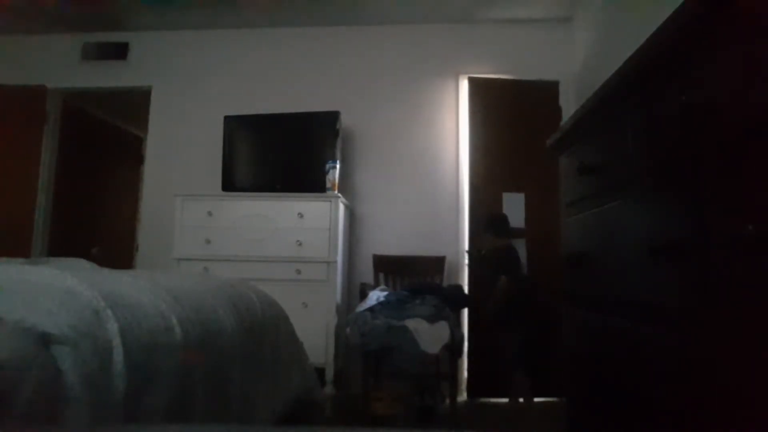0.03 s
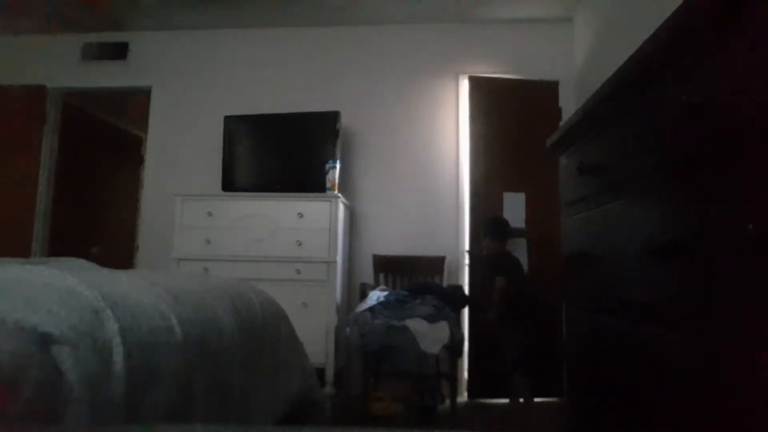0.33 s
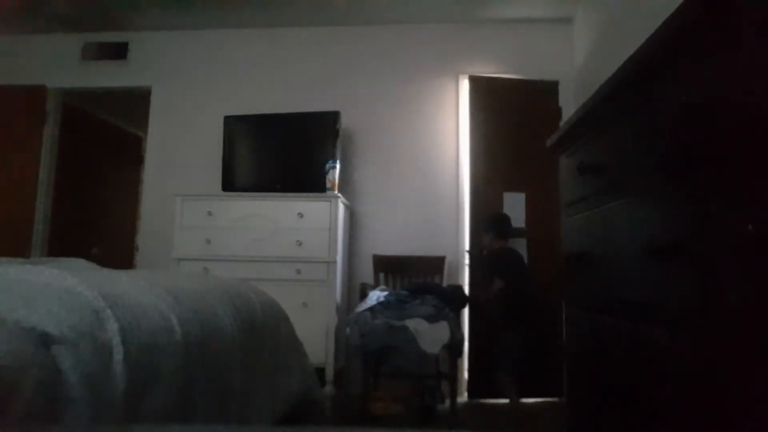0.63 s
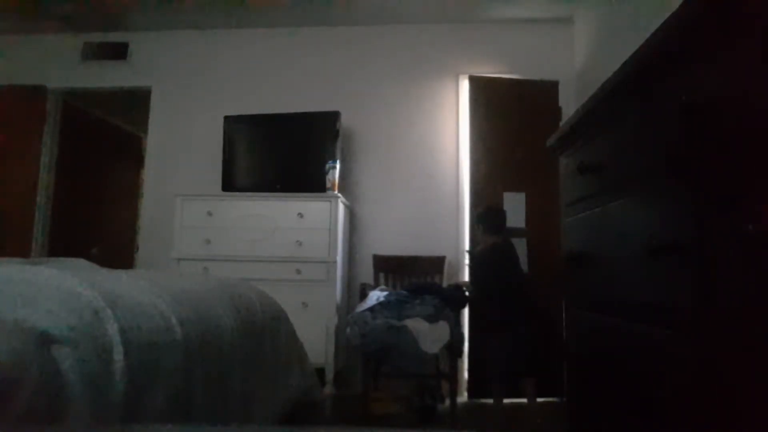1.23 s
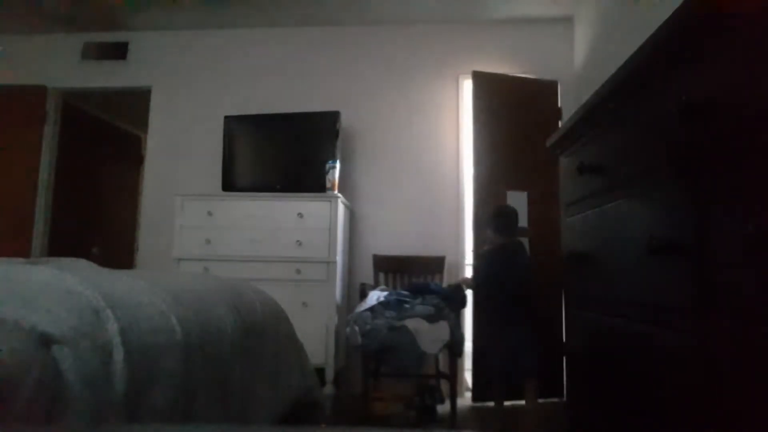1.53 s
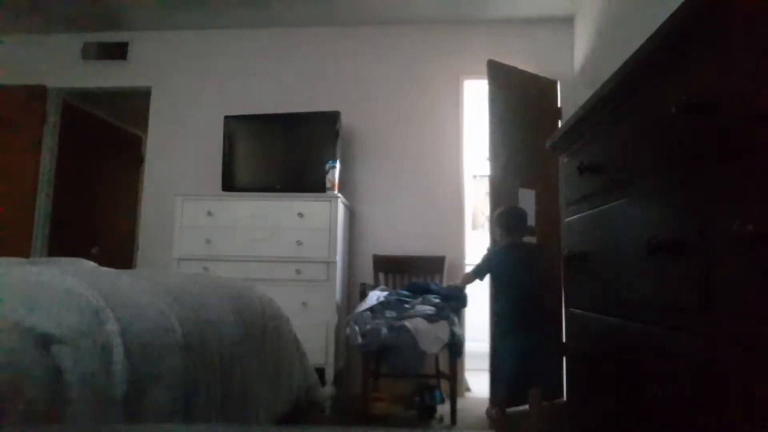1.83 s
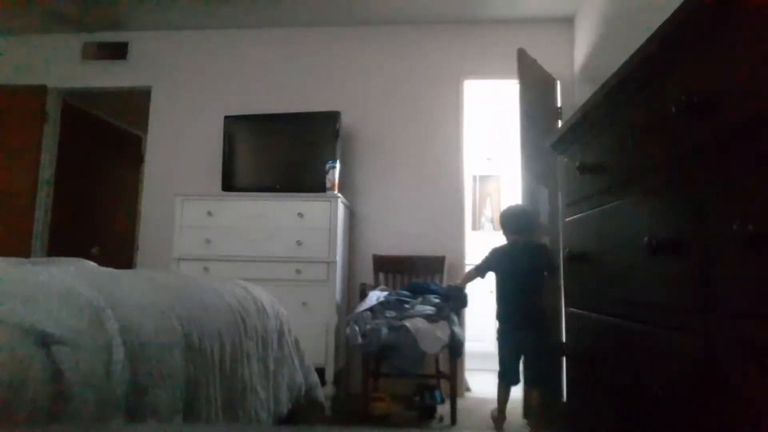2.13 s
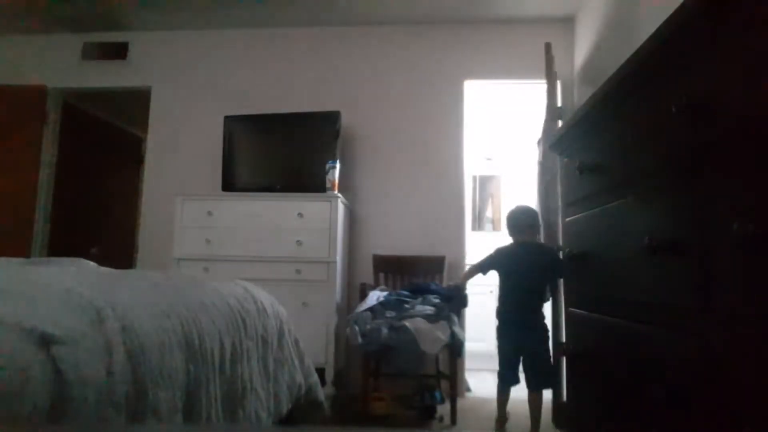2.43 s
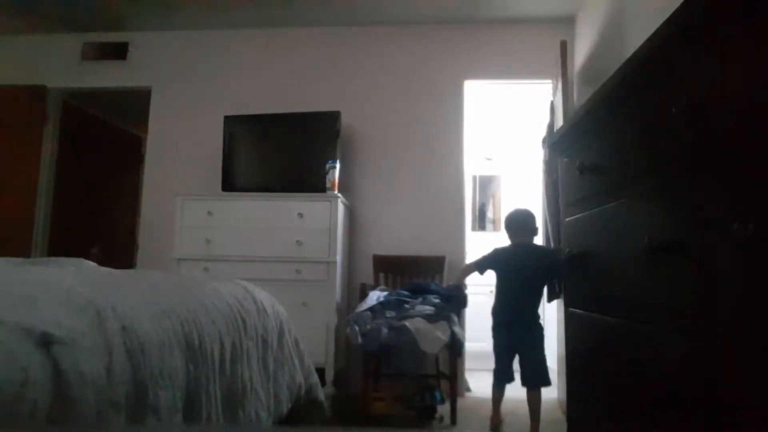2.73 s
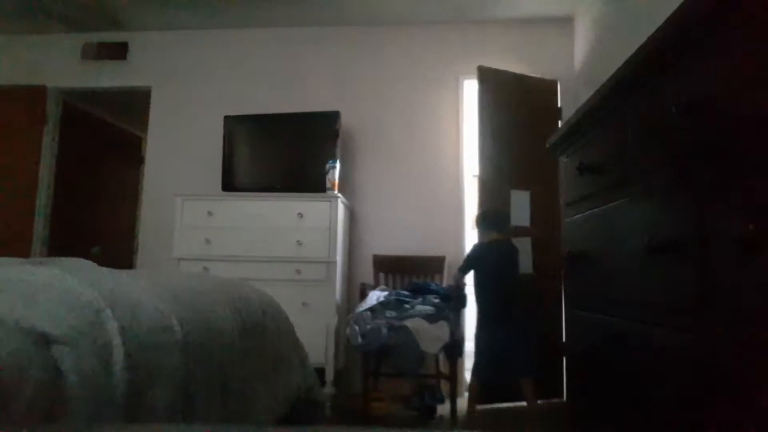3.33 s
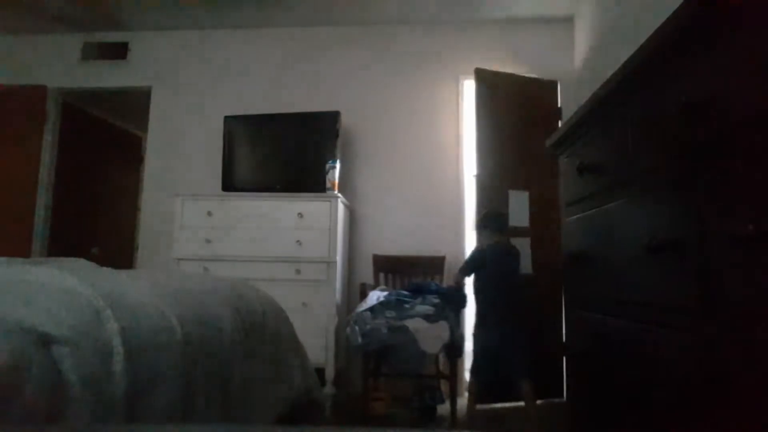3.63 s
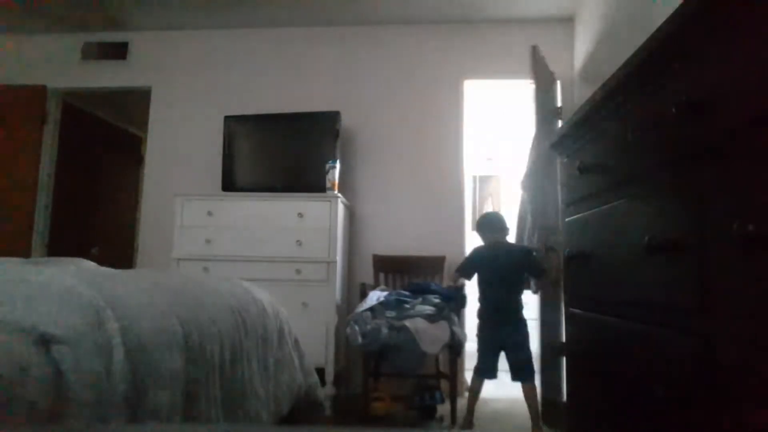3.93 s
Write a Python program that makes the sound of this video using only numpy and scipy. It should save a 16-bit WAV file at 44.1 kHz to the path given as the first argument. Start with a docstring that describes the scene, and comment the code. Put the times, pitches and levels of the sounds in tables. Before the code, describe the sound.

Squeaky door hinges whistle and judder as the door swings, knocking and clicking in a quiet room.

```python
"""Creaking bedroom door

A quiet bedroom, the microphone across the room from a door that is swung open, pushed nearly shut and
pulled again. Its dry hinges stick and slip: they whistle, squeak and judder so that the door panel hums.
The door rubs faintly before it gives, and later knocks and clicks. Right at the microphone a camera's
focus motor buzzes briefly, then ticks; under it all lies the dull background of the house."""
import sys
import numpy as np
from scipy import signal
from scipy.fft import rfft, irfft
from scipy.io import wavfile

SR = 44100
rng = np.random.default_rng(int(sys.argv[2]) if len(sys.argv) > 2 else 0)


def wrap_up_sound(samples):
    """Save the sound to the file named by the first command line argument, as 16-bit audio."""
    columns = np.atleast_2d(samples).T
    # keep every value between -1 and 1, then stretch to whole-number steps
    tamed = np.clip(columns, -1, 1)
    steps = np.round(tamed * 32767).astype(np.int16)
    wavfile.write(sys.argv[1], SR, steps)


N = 176400
T = np.arange(N) / SR


def from_db(db):
    """Decibels to gain."""
    return 10 ** (np.asarray(db) / 20)


def unit_rms(x):
    """Scale to an rms of 1."""
    return x / np.sqrt(np.mean(x ** 2) + 1e-20)


def in_time(rows):
    """Each column of a timed curve at every sample."""
    times, *columns = np.transpose(rows)
    return [np.interp(T, times, column) for column in columns]


def at_hz(points, hz):
    """Read a table on a log-frequency axis."""
    freqs, values = np.transpose(points)
    return np.interp(np.log(hz), np.log(freqs), values)


def gate(start, end, attack_s=0.0074, release_s=0.0063):
    """Attack, hold and release between two times."""
    return np.clip((T - start) / attack_s, 0, 1) * np.clip((end - T) / release_s, 0, 1)


def drift(hz, size):
    """Random wander, mostly slower than hz, with an rms of 1."""
    pole = np.exp(-2 * np.pi * hz / SR)
    white = rng.standard_normal(size + SR // 10)
    return unit_rms(signal.lfilter([1], [1, -2 * pole, pole * pole], white)[-size:])


def clicks(turns):
    """One unit click at each whole turn."""
    return np.diff(np.floor(turns), prepend=np.floor(turns[0]))


def ring(drive, modes):
    """Damped modes (frequency [Hz], level [dB], t60 [s]) rung in parallel by one drive."""
    out = 0
    for hz, db, t60 in modes:
        radius, angle = from_db(-60 / (t60 * SR)), 2 * np.pi * hz / SR
        feedback = [1, -2 * radius * np.cos(angle), radius ** 2]
        out = out + from_db(db) * signal.lfilter([.5, 0, -.5], feedback, drive + 1e-18)
    return out


def panned(x, pan_db):
    """Place a sound in the stereo image; pan_db is left minus right."""
    return x * from_db([[pan_db / 2], [-pan_db / 2]])


# diffuse sound at the microphone: (frequency [Hz], left-right correlation [0-1])
STEREO_LIKENESS = [(100, 0.89), (300, 0.73), (700, 0.66), (1500, 0)]


def noise_bands(size):
    """Half-octave bands of stereo noise, both sides alike in the bass; yields (centre Hz, band)."""
    edges = 22 * 2 ** (np.arange(20) / 2)
    white = rng.standard_normal((2, 2, size))
    for k, (low, high) in enumerate(zip(edges, edges[1:])):
        bandpass = signal.butter(2, [low, high], "band", fs=SR, output="sos")
        mid, side = signal.sosfilt(bandpass, white[k % 2])
        hz = np.sqrt(low * high)
        alike = at_hz(STEREO_LIKENESS, hz)
        yield hz, np.sqrt(1 + alike) * mid + np.sqrt(1 - alike) * side * [[1], [-1]]


# colour of the room tone: (frequency [Hz], relative density [dB])
ROOM_TONE_SPECTRUM = [(25, -30), (59, -7.5), (89, -13.5), (200, -7), (500, -6), (1240, -24.5),
                      (1920, -18.5), (2370, -25.5), (15000, -38.5)]
# its loudness at the microphone: (time [s], level [dB])
ROOM_TONE_LEVEL = [(0, -42.5), (.08, -56), (.3, -59), (1.1, -59), (2.7, -56.5), (3.3, -53.5), (4, -55.5)]


def room_tone(flicker_db=1.8, flicker_hz=35):
    """Soft, dull background of the house, all around the microphone; each band flickers a little."""
    level_db, = in_time(ROOM_TONE_LEVEL)
    noise = sum(band * from_db(at_hz(ROOM_TONE_SPECTRUM, hz) + flicker_db * drift(flicker_hz, N))
                for hz, band in noise_bands(N))
    return from_db(level_db) * unit_rms(noise)


# resonances of the camera's lens: (frequency [Hz], relative level [dB], t60 [s])
LENS_MODES = [(4030, -13, 0.0099), (4470, -2, 0.0015), (11560, -2.5, 0.0034), (14000, -13, .002)]


def focus_motor(steps_per_s=551, buzz_db=-48, buzz_end_s=0.195, ticks_per_s=29.45, tick_db=-54.5):
    """Right at the microphone, a motor rings the lens: a thin buzz of uneven steps, then faint ticks."""
    step_rate = steps_per_s * (1 + 0.0098 * drift(140, N))
    steps = clicks(np.cumsum(step_rate) / SR)
    buzz = steps * from_db(buzz_db + rng.standard_normal(N))   # steps vary by about 1 dB
    ticks = from_db(tick_db) * clicks((T - 0.0215) * ticks_per_s)
    lens = ring(np.where(T < buzz_end_s, buzz, ticks), LENS_MODES)
    return signal.sosfilt(signal.butter(8, 3700, "high", fs=SR, output="sos"), lens)


# the door rubs before it gives: (time [s], length [s], level [dB])
DOOR_RUBS = [(.49, .08, -76), (.68, .12, -73)]


def door_rubs(hz=1900, t60_s=0.008):
    """Dry friction, a narrow hiss that barely carries across the room."""
    hiss = unit_rms(ring(rng.standard_normal(N), [(hz, 0, t60_s)]))
    return hiss * sum(from_db(db) * gate(start, start + length) for start, length, db in DOOR_RUBS)


SLIPS_PER_S, STUTTER_HZ = 31.7, 90   # a hinge's regular slipping; bandwidth of its random catching


def friction_tone(hz, overtones_db, rough, waver_share=0.04, shimmer_db=3, waver_hz=323):
    """Stick-slip tone with overtones; the rougher it is, the more pitch and strength waver."""
    hz = hz * (1 + rough * waver_share * drift(waver_hz, len(hz)))
    phase = 2 * np.pi * np.cumsum(hz) / SR
    tone = np.sin(phase)
    for k in range(2, int(SR / 2 / hz.mean()) + 1):
        tone += from_db(overtones_db * (k - 1) ** (3 / 4)) * np.sin(k * phase)
    shimmer = from_db(rough * shimmer_db * drift(waver_hz, len(hz)))
    return unit_rms(tone * shimmer)


# two long whistles of a hinge: (time [s], pitch [Hz], level [dB])
HIGH_GLIDE = [(1.25, 11460, -38), (1.274, 11350, -37.5), (1.312, 11100, -31.5), (1.348, 10670, -29),
              (1.41, 9970, -42.5), (1.45, 9860, -60)]
LOW_GLIDE = [(1.96, 2430, -80), (1.992, 2530, -63), (2.012, 2476, -44.5), (2.045, 2428, -36.5),
             (2.1, 2379, -35), (2.235, 2376, -37.5), (2.28, 2350, -49.5), (2.32, 2280, -65)]


def hinge_whistle(glide, overtones_db, rough, flutter_share, flutter_db, crest_s):
    """A gliding friction tone whose pitch and strength flutter at the slip rate, cresting at crest_s."""
    hz, db = in_time(glide)
    flutter = np.cos(2 * np.pi * SLIPS_PER_S * (T - crest_s))
    tone = friction_tone(hz * (1 + flutter_share * flutter), overtones_db, rough)
    return tone * from_db(db + flutter_db * (flutter - .5)) * gate(glide[0][0], glide[-1][0])


# short squeaks of the hinges: (time [s], length [s], first pitch [Hz], last pitch [Hz], level [dB],
# overtones [dB], roughness [0 clear, about 1 rough], pan [dB])
HINGE_SQUEAKS = [ (1.345, 0.069, 5390, 5020, -40, -47, 0.02, -1.5),
                 (1.402, 0.049, 1860, 2090, -49, -34, 1.1, 2),
                 (1.407, 0.091, 3234, 3420, -46, -21, 0.27, 6),
                 (1.416, 0.03, 8400, 8370, -38.5, -40, 0, -0.5),
                 (1.468, 0.017, 1705, 1640, -29.5, -7, 0.4, -3),
                 (1.469, 0.043, 4007, 4160, -35, -23, 0.2, 0),
                 (1.51, 0.0566, 4115, 4153, -35, -19, 0.25, -1.5),
                 (1.532, 0.09, 1730, 1544, -49.5, -7, 1.23, 3),
                 (1.751, 0.037, 1995, 1909, -49.5, -41, 0.7, -1),
                 (2.546, .036, 2088, 2040, -31.5, -11.5, 0.94, 1),
                 (2.551, 0.039, 2401, 2452, -36.5, -7.5, 0.9, -8),
                 (2.857, 0.045, 2065, 1535, -37, -27, 0.26, 1),
                 (2.886, 0.034, 3150, 3232, -47, -13.5, 0.22, -5),
                 (3.231, 0.073, 12800, 13100, -47.5, -44, 0.25, -12),
                 (3.257, 0.058, 11150, 11390, -31.5, -25, 0.11, -4),
                 (3.279, 0.018, 11300, 11280, -28.5, -40, .03, -12),
                 (3.280, 0.072, 9320, 9450, -45.5, -22, 0.37, -2),
                 (3.287, 0.037, 2056, 1926, -48, -34, 0.52, 1.5),
                 (3.407, 0.032, 5590, 5540, -38.5, -11, 0.45, -6),
                 (3.488, 0.027, 4700, 4920, -38.5, -13, 0.42, 1),
                 (3.479, 0.036, 1936, 1877, -40.5, -8, 1.1, 4),
                 (3.514, 0.03, 1937, 2036, -29.5, -18.5, 0.35, -1.5),
                 (3.729, 0.016, 2820, 2790, -42.5, -26, 0.86, 1.5),
                 (3.769, 0.046, 2794, 2664, -34, -14.5, 0.49, -2.5),
                 (3.798, 0.027, 2140, 1850, -30.5, -15, 1.04, 1),
                 (3.86, 0.018, 2044, 1898, -23, -22.5, 0.02, 1.5)]


def hinge_squeaks(stutter_db=5):
    """Each squeak slides from its first pitch to its last; rough ones catch and break up."""
    out = np.zeros((2, N))
    for start, length, first_hz, last_hz, db, overtones_db, rough, pan_db in HINGE_SQUEAKS:
        span = slice(int(start * SR), int(start * SR) + SR // 8)
        hz = np.interp(T[span], [start, start + length], [first_hz, last_hz])
        catching = np.tanh(2 * drift(STUTTER_HZ, len(hz)))
        stutter = unit_rms(from_db(stutter_db * np.sqrt(rough) * catching))
        envelope = from_db(db) * gate(start, start + length)[span]
        out[:, span] += panned(friction_tone(hz, overtones_db, rough) * stutter * envelope, pan_db)
    return out


# resonances of the door panel: (frequency [Hz], relative level [dB], t60 [s])
PANEL_MODES = [(64.4, -11, 0.3), (127.9, 1, 0.45), (219.3, -7, 0.11), (239, -8.5, 0.12),
               (321, -12.5, 0.059), (540, -8.5, 0.051), (405, -14, 0.069), (696, -9, 0.011),
               (1167, -17, 0.071)]


def panel_hum(slips, slip_speed, grind_db=14, swing_db=2.5, kick_spread_db=0.5, shudder_db=2.5):
    """Uneven slips kick the panel's two lowest modes, grinding drives the rest, and the whole shudders."""
    grinding = unit_rms(rng.standard_normal(N) * from_db(swing_db * slip_speed))
    kicks = unit_rms(clicks(slips) * from_db(kick_spread_db * rng.standard_normal(N)))
    hum = ring(kicks, PANEL_MODES[:2]) + from_db(grind_db) * ring(grinding, PANEL_MODES[2:])
    shudder = from_db(shudder_db * np.tanh(drift(STUTTER_HZ, N)))
    return unit_rms(hum * shudder)


# course of the judder: (time [s], squeal level [dB], roughness [0-1], panel level [dB])
HINGE_JUDDER = [(1.491, -35, 0.21, -84), (1.571, -36.5, .15, -49), (1.61, -35, 1, -42.5),
                (1.665, -37, 0.87, -38.5), (1.721, -36.5, 0.89, -42), (1.765, -39, .8, -43.5),
                (1.795, -69, .8, -40.5), (1.83, -74, .8, -50.5)]


def hinge_judder(clear_hz=4985, sag_hz=199, bend_share=0.036, overtones_db=-22.5, first_slip_s=1.503):
    """A clear squeal sinks as it turns raspy; each slip bends it, chirps and kicks the door panel."""
    squeal_db, rough, panel_db = in_time(HINGE_JUDDER)
    moving = gate(HINGE_JUDDER[0][0], HINGE_JUDDER[-1][0])
    level = from_db(squeal_db) * moving
    slips = (T - first_slip_s) * SLIPS_PER_S
    slip_speed = np.cos(2 * np.pi * slips)
    hz = clear_hz - sag_hz * rough
    squeal = friction_tone(hz * (1 + bend_share * rough * slip_speed), overtones_db, rough)
    squeal = unit_rms(squeal * from_db(slip_speed))   # swings 1 dB either way with each slip
    sizzle = from_db(-19.5) * friction_tone(3 * hz, overtones_db, rough.max())   # rough third harmonic
    octave = friction_tone(np.full(N, 2 * hz.mean()), overtones_db, rough=0.178)
    from_slip_s = (slips - np.round(slips)) / SLIPS_PER_S
    chirps = from_db(4) * octave * np.exp(-(from_slip_s / 0.0032) ** 2)   # a few ms around each slip
    panel = panel_hum(slips, slip_speed) * from_db(panel_db) * moving
    return (squeal + sizzle) * level, chirps * level, panel


# knocks and clicks of the door: (time [s], thud [dB], wood [dB], rattle [dB], latch [dB])
DOOR_KNOCKS = [(2.392, -73, -63, -38.5, -74.5), (2.597, -58, -51, -39, -54), (2.614, -39, -42, -32, -45.5),
               (3.010, -48, -42.5, -39.5, -79), (3.019, -46.5, -32, -47.5, -89),
               (3.157, -52.5, -54.5, -43, -84), (3.513, -46, -40, -41.5, -42),
               (3.639, -66, -57, -41.5, -73.5), (3.680, -64, -43.5, -40.5, -52),
               (3.697, -34, -45.5, -49.5, -39), (3.723, -57, -46.5, -38, -56),
               (3.989, -68, -44.5, -41, -64)]


def door_knocks(attack_s=0.0022, t60_s=0.061, thud_coupling_db=-17):
    """Each knock is a short rattling burst with its own colour; its thud rings the door panel."""
    wood_hz, rattle_hz, latch_hz = 635, 2060, 11000
    bursts, thuds = np.zeros((2, N + SR))
    t = T[:SR // 4]
    envelope = np.minimum(t / attack_s, 1) * from_db(-60 * t / t60_s)
    hz = np.maximum(np.fft.rfftfreq(len(t), 1 / SR), 1)
    pink = np.sqrt(SR / hz)
    for start, thud_db, *levels_db in DOOR_KNOCKS:
        span = slice(int(start * SR), int(start * SR) + len(t))
        noise = rng.standard_normal(len(t))
        colour = pink * from_db(np.interp(np.log(hz), np.log([wood_hz, rattle_hz, latch_hz]), levels_db))
        bursts[span] += envelope * irfft(rfft(noise) * colour, len(t))
        thuds[span] += envelope * noise * from_db(thud_db + thud_coupling_db)
    rattle = signal.sosfilt(signal.butter(4, 152, "high", fs=SR, output="sos"), bursts[:N])
    return rattle + ring(thuds[:N], PANEL_MODES[2:])


# decay of the bedroom: (frequency [Hz], t60 [s])
BEDROOM_DECAY = [(120, 0.33), (2000, 0.23), (5000, 0.23), (12000, 0.13)]
# echoes off the nearest walls: (left delay [s], right delay [s], level against the tail [dB])
WALL_ECHOES = [(.0075, 0.008, -9), (0.0175, 0.015, -10.5)]


def bedroom(x, wet_db, tail_delay_s=0.0017, right_lag_s=0.00007):
    """From door to microphone: direct sound, wall echoes and a tail that dies faster in the treble."""
    t = T[:SR // 2]
    tail = sum(band * from_db(-60 * t / at_hz(BEDROOM_DECAY, hz)) for hz, band in noise_bands(len(t)))
    response = unit_rms(tail * (t > tail_delay_s)) / np.sqrt(len(t))
    for left_s, right_s, db in WALL_ECHOES:
        response[[0, 1], [int(left_s * SR), int(right_s * SR)]] += from_db(db)
    response *= from_db(wet_db)
    response[[0, 1], [0, int(right_lag_s * SR)]] += 1   # direct sound
    return signal.fftconvolve(np.atleast_2d(x), response, axes=1)[:, :N] / np.hypot(1, from_db(wet_db))


def scene():
    """The door sounds from across the bedroom; the focus motor is close and dry."""
    squeal, chirps, panel = hinge_judder()
    high_whistle = hinge_whistle(HIGH_GLIDE, overtones_db=-43, rough=0.058,
                                 flutter_share=0.0043, flutter_db=5.5, crest_s=1.277)
    low_whistle = hinge_whistle(LOW_GLIDE, overtones_db=-16, rough=0.018,
                                flutter_share=0.0038, flutter_db=11.5, crest_s=2.106)
    door = (bedroom(hinge_squeaks() + door_rubs(), wet_db=0)
            + bedroom(panned(high_whistle, pan_db=-2), wet_db=-2.5)
            + bedroom(panned(low_whistle, pan_db=1.5), wet_db=-8)
            + bedroom(squeal, wet_db=-0.5)
            + bedroom(panned(chirps, pan_db=-8) + panel, wet_db=-7.5)
            + bedroom(panned(door_knocks(), pan_db=1.5), wet_db=1.5))
    return door + panned(room_tone(), pan_db=2.5) + focus_motor()


def record(dry):
    """The top rolls off gently, then is cut steeply."""
    roll_off_hz, cutoff_hz = 15400, 15800
    soft = signal.sosfilt(signal.butter(4, roll_off_hz, fs=SR, output="sos"), dry)
    return signal.sosfilt(signal.ellip(10, .2, 70, cutoff_hz, fs=SR, output="sos"), soft)


dry = scene()
out = record(dry)
wrap_up_sound(out)
```